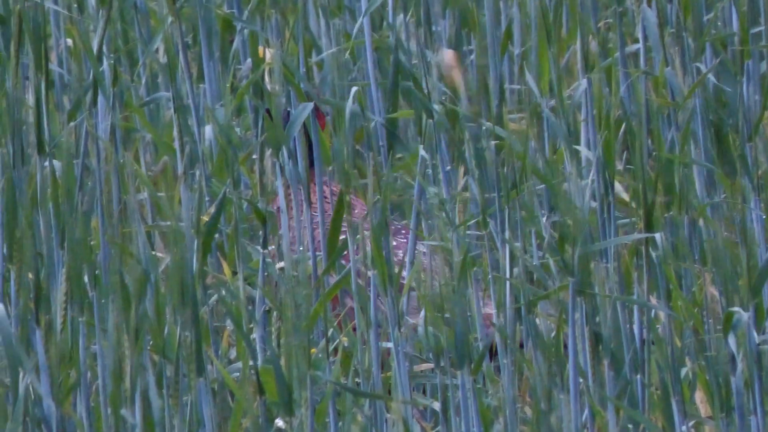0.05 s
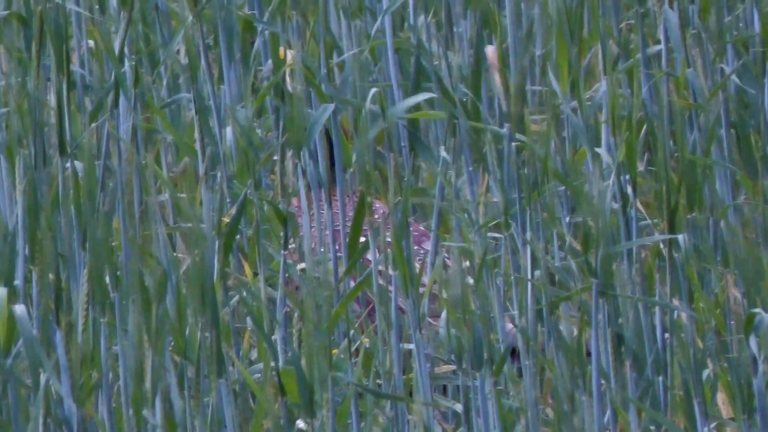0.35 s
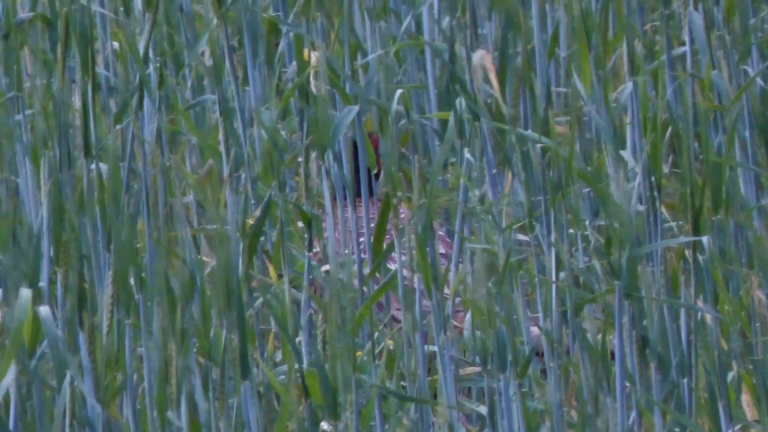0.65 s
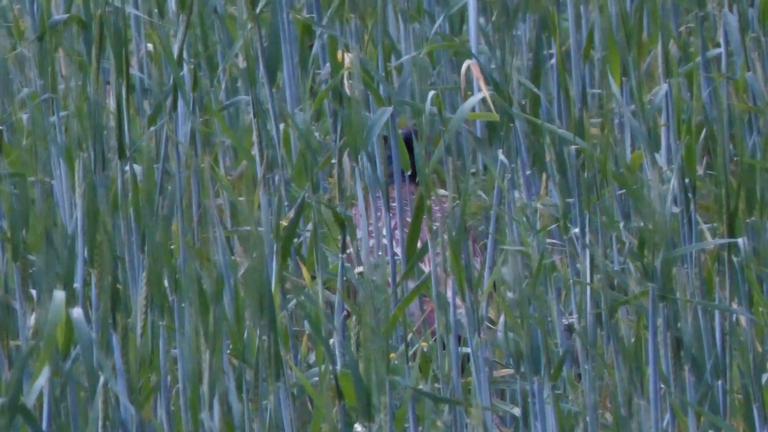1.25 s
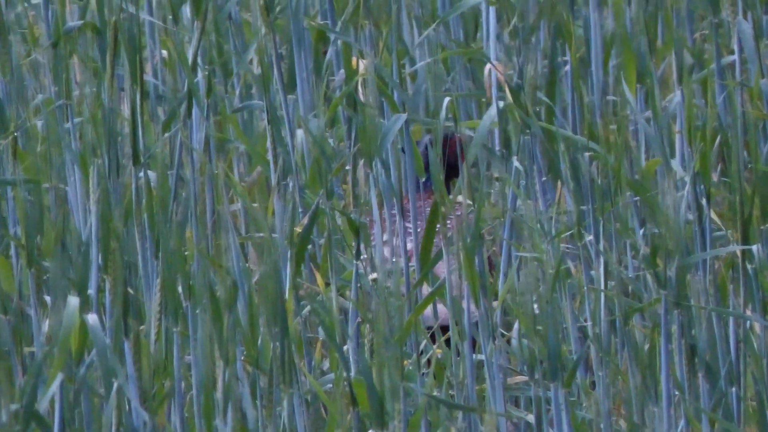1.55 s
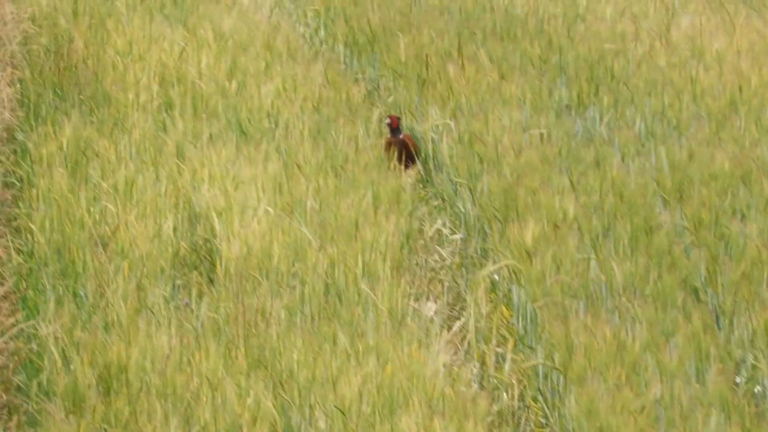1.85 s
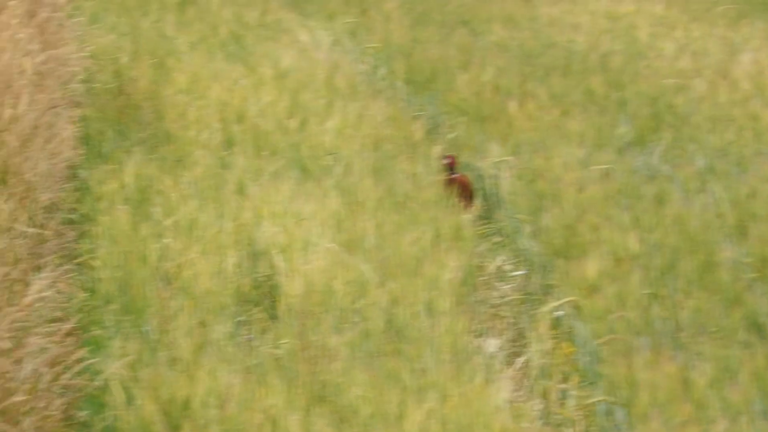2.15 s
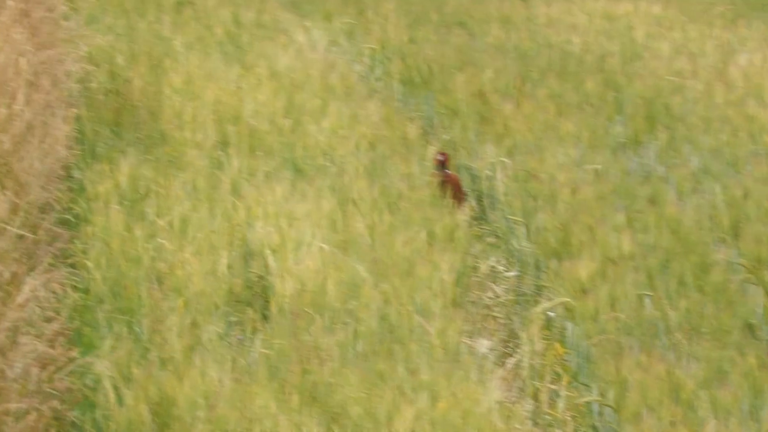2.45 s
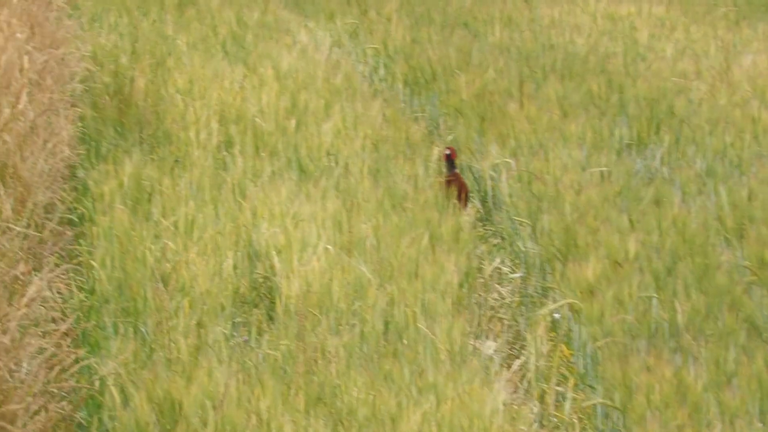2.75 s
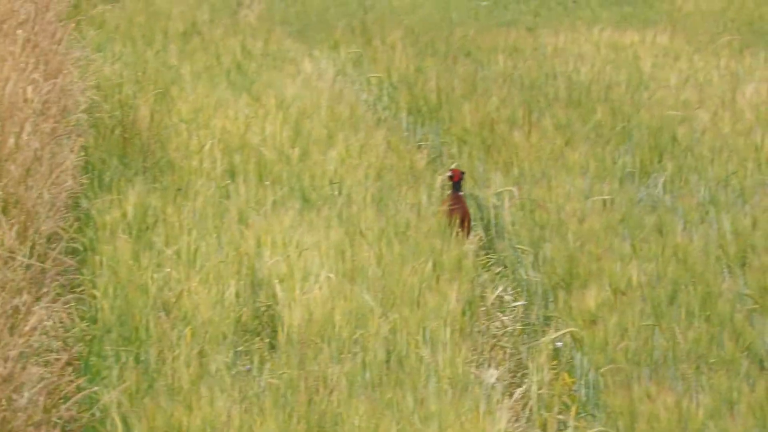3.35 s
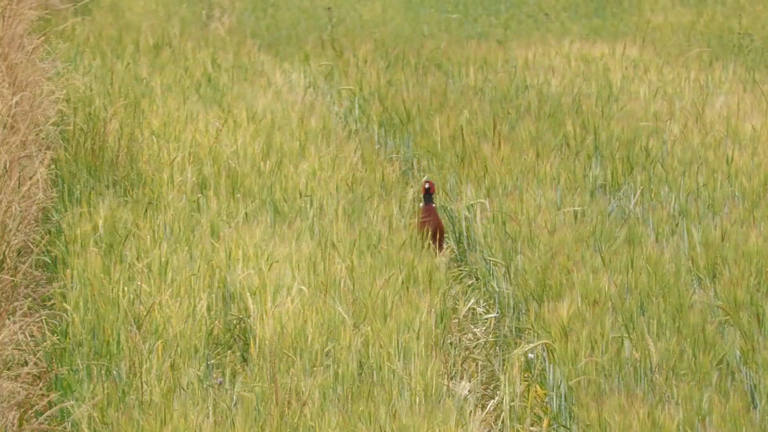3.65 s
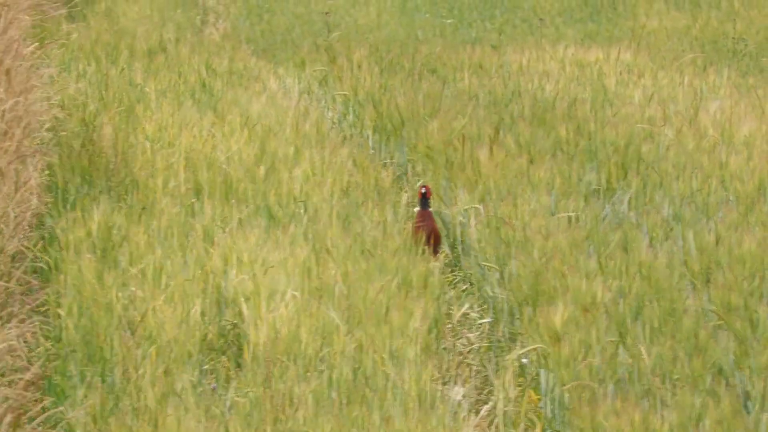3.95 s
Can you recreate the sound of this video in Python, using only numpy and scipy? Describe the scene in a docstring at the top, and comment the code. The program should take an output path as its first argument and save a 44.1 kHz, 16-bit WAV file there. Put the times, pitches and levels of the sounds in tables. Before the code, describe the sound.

A pheasant crows two short, harsh notes in a grain field while wind buffets the microphone, leaves rustle and a small bird peeps. The wind then cuts off, leaving a distant songbird whistling over soft air noise.

```python
"""Gusts of wind buffet two microphone ports in a grain field; leaves rustle and a bird peeps.
A cock pheasant crows two harsh notes: a tone near 1 kHz, modulated by an uneven flutter, shaped by
the resonances of throat and beak, and scattered back by stalks and far trees.
The scene then changes to a calm field, where a distant songbird whistles over soft air noise,
a faint hum and far twittering."""
import sys
import numpy as np
from scipy import signal
from scipy.fft import rfft, irfft
from scipy.io import wavfile
from scipy.ndimage import uniform_filter1d, minimum_filter1d

SR = 44100
rng = np.random.default_rng(int(sys.argv[2]) if len(sys.argv) > 2 else 0)


def materialize(psi):
    """Save the field psi as 16-bit PCM at rate SR to the path in sys.argv[1].

    A 1-D psi becomes a single channel; in a 2-D psi each row is a channel.
    """
    bounded = np.clip(np.atleast_2d(psi).T, -1, 1)
    quanta = np.round(bounded * 32767).astype(np.int16)
    wavfile.write(sys.argv[1], SR, quanta)


N = 176400
T = np.arange(N) / SR
CHANGE_S = 1.455  # the windy field gives way to the calm one


def amp(db):
    """Amplitude ratio of a level: a factor of ten per 20 dB."""
    return 10 ** (np.asarray(db) / 20)


def unit(x):
    """Normalisation to an rms of 1."""
    return x / np.sqrt(np.mean(x ** 2) + 1e-20)


def curve(rows, t, column=1):
    """Linear interpolation of a table column over time."""
    rows = np.array(rows)
    return np.interp(t, rows[:, 0], rows[:, column])


def spectrum(rows, hz, column=1):
    """Interpolation of a table column over log frequency."""
    rows = np.array(rows)
    return np.interp(np.log(hz + 1), np.log(rows[:, 0] + 1), rows[:, column])


def add(mix, start_s, sound):
    """Superposition: a sound adds to the mix from its start time."""
    part = mix[max(round(start_s * SR), 0):][:len(sound)]
    part += sound[:len(part)]


def wander(n, hz):
    """Random modulation: n samples of low-pass Gaussian noise with an rms near 1."""
    f = np.fft.rfftfreq(N, 1 / SR)
    return unit(irfft(rfft(rng.standard_normal(N)) * np.exp(-(f / hz) ** 2), N))[:n]


def colour(x, rows, column=1, size=2048):
    """Minimum-phase filtering: the phase follows from the log gain by the Hilbert transform."""
    hz = abs(np.fft.fftfreq(size, 1 / SR))
    log_gain = np.log(amp(spectrum(rows, hz, column)))
    taps = np.fft.ifft(np.exp(np.conj(signal.hilbert(log_gain)))).real
    return signal.oaconvolve(x, taps)[:len(x)]


def correlate(a, b, correlation):
    """Partial coherence: two independent noises mix into a correlated left-right pair."""
    c = np.clip(correlation, -1, 1)
    return np.array([a, c * a + np.sqrt(1 - c ** 2) * b])


# Likeness of ambient noise at the two ports: f/Hz, correlation
AMBIENT_CORRELATION = [(30, 0.93), (200, 1), (1000, 0.66), (2500, 0.015), (5000, -0.041), (8000, -0.35),
                       (15000, -0.27)]
def noise(rows, correlation=None):
    """Spectral shaping: white noise takes a table's colour, partly coherent at the two ports."""
    hz = np.fft.rfftfreq(N, 1 / SR)
    if correlation is None:
        correlation = spectrum(AMBIENT_CORRELATION, hz)
    white = correlate(*rfft(rng.standard_normal((2, N))), correlation)
    return unit(irfft(white * amp(spectrum(rows, hz)), N))


# Likeness of reflected sound at the two ports: f/Hz, correlation
ECHO_CORRELATION = [(1000, 0.99), (2600, 0.25), (4200, 0.7), (5500, -0.21), (7200, -0.29), (12000, -0.26)]
def echo(x, rows, build_s, size=256):
    """Reverberation: dense reflections build up, then each band falls 60 dB in its time T60."""
    hz, t, (a, b) = signal.stft(rng.standard_normal((2, SR)), SR, nperseg=size)
    reflections = correlate(a, b, spectrum(ECHO_CORRELATION, hz)[:, None])
    t60 = spectrum(rows, hz, column=2)[:, None]
    envelope = amp(-60 * t / t60) * (1 - np.exp(-(t / build_s) ** 2))
    energy = (envelope ** 2).mean(1, keepdims=True) * SR
    envelope = envelope / np.sqrt(energy) * amp(spectrum(rows, hz))[:, None]
    response = signal.istft(reflections * envelope, SR, nperseg=size)[1]
    return signal.fftconvolve(x[None], response, axes=1)[:, :N]


# Air over the calm field: f/Hz, relative spectral density/dB
CALM_AIR_SPECTRUM = [(12, -13), (27, 0), (65, 1), (120, -4), (190, -3), (330, -6.5), (600, -6.5),
                     (1080, -6), (1580, -12.5), (3000, -13.5), (4400, -15.5), (5500, -18.5), (7000, -21),
                     (10000, -24.5), (15500, -27)]
def calm_air(db=-41):
    """Broadband noise under slight amplitude modulation: soft, nearly steady air."""
    return amp(db + 0.14 * wander(N, hz=14)) * noise(CALM_AIR_SPECTRUM)


# Partials of a faint far hum: f/Hz, level/dB
HUM_PARTIALS = [(86, -55.5), (527.6, -57), (1055, -56.5)]
def hum(waver_hz=4):
    """Random frequency modulation makes each pure tone waver."""
    tones = np.zeros(N)
    for hz, db in HUM_PARTIALS:
        phase = 2 * np.pi * np.cumsum(hz + waver_hz * wander(N, hz=11.4)) / SR
        tones += amp(db) * np.sqrt(2) * np.sin(phase)
    return tones


# Air over the windy field: f/Hz, relative spectral density/dB
WINDY_AIR_SPECTRUM = [(200, -6), (600, 3.5), (1100, -2), (1600, -6.5), (2100, -5.5), (3000, -10),
                      (4500, -12.5), (7000, -24), (12000, -27)]
def windy_air(db=-36.5):
    """Stationary broadband noise: a steady rush beneath the gusts."""
    return amp(db) * noise(WINDY_AIR_SPECTRUM)


# Strength of the rustle: t/s, level/dB
RUSTLE_LEVELS = [(0, -43.5), (.2, -50), (.4, -54), (.55, -51), (1, -43), (1.28, -52), (1.44, -55)]
# Colour of the rustle: f/Hz, relative spectral density/dB
LEAF_SPECTRUM = [(1000, -36), (3000, -1), (7000, 3.5), (11000, -2.5), (16000, -8.5)]
def leaves(flicker_db=1.4):
    """Amplitude-modulated noise: leaves stirred by the gusts give a flickering hiss."""
    rustle = noise(LEAF_SPECTRUM) * amp(flicker_db * wander(N, hz=150))
    return amp(curve(RUSTLE_LEVELS, T)) * unit(rustle)


# Gusts on the ports: t/s, rumble level/dB, relative buffet level/dB, buffet left minus right/dB
PORT_GUSTS = [(0.0, -16.5, -20.5, 1), (0.096, -21, -43, -10), (0.144, -9, -19, -10.5),
              (0.256, -19, -30, -5.5), (0.332, -14, -40.5, -13.5), (0.468, -26.5, -44.5, -3),
              (0.52, -22, -43.5, 1), (0.62, -11.5, -25.5, -12), (0.676, -26, -70, -6),
              (0.7, -15.5, -28, -7), (0.794, -19.5, -42.5, -3), (0.874, -17, -28.5, -7.5),
              (1.126, -16, -34, -10), (1.174, -18.5, -30, -5.5), (1.246, -15, -29, -7.5),
              (1.338, -24, -40, -9), (1.398, -20, -35, -6), (1.44, -23, -42, -9)]
# Deep rumble and the buffeting above it: f/Hz, relative spectral density/dB
RUMBLE_SPECTRUM = [(10, -8), (35, -0.5), (70, -2.5), (130, -6.5), (200, -18), (320, -32), (700, -74),
                   (2000, -99)]
BUFFET_SPECTRUM = [(80, -30), (170, 4), (260, -2), (400, -10), (600, -20.5), (1200, -69), (3000, -59),
                   (9000, -93)]
def wind(buffet_db=4, lump_db=1.5, lump_hz=23.3):
    """Turbulent pressure fluctuations: gusts strike the two ports in weakly correlated lumps."""
    lumps = amp(lump_db * np.array([wander(N, lump_hz), wander(N, lump_hz)]))
    sides = amp(np.array([[.5], [-.5]]) * curve(PORT_GUSTS, T, column=3))
    rumble = unit(lumps * noise(RUMBLE_SPECTRUM, correlation=-0.042))
    rumble *= amp(curve(PORT_GUSTS, T))
    buffet = unit(lumps * noise(BUFFET_SPECTRUM, correlation=0.25))
    buffet *= amp(buffet_db + curve(PORT_GUSTS, T, column=2))
    return sides ** 0.62 * rumble + sides * buffet  # the rumble leans less to one side


# Scatter from the grain stalks: f/Hz, gain/dB, T60/s
STALK_SCATTER = [(300, -6, 0.14), (1020, -14, 0.29), (2010, -1, 0.18), (3770, -6, 0.25), (4640, 2.5, 0.63),
                 (8000, -1, 0.57), (15000, -21, .25)]
def stalks(sound, build_s):
    """Scattering: many stalks return a sound as a short, bright reverberation."""
    return echo(sound, STALK_SCATTER, build_s)


def twitter(count=22, centre_hz=5190, spread=0.082, glide=0.115, length_s=0.0295, db=-51.5):
    """Linear frequency sweeps: small far birds chirp at random, heard only as scattered sound."""
    chirps, t = np.zeros(N), np.arange(0, length_s, 1 / SR)
    for when, pitch, slope in rng.uniform(-1, 1, (count, 3)):
        start = CHANGE_S + (when + 1) / 2 * (T[-1] - CHANGE_S)
        hz = centre_hz * (1 + spread * pitch + glide * np.sign(slope) * t / length_s)
        add(chirps, start, np.hanning(len(t)) * np.sin(2 * np.pi * np.cumsum(hz) / SR))
    return amp(db) * stalks(chirps, build_s=.003)


def whistles(rows, edge_s, waver=0.0071, shimmer_db=2):
    """Frequency modulation: pure tones glide along parabolas, burred more the wider they sweep."""
    song = np.zeros(N)
    for start, length, first, middle, last, db in rows:
        t = np.arange(0, length, 1 / SR)
        n = len(t)
        glide = np.polyval(np.polyfit([0, .5, 1], [first, middle, last], 2), t / length)
        burr = 0.09 * abs(last - first) / middle
        hz = glide * (1 + waver * wander(n, hz=120) + burr * wander(n, hz=265))
        edge = np.clip(np.minimum(t, length - t) / edge_s, 0, 1)
        level = edge * amp(db + shimmer_db * wander(n, hz=131))
        add(song, start, level * np.sqrt(2) * np.sin(2 * np.pi * np.cumsum(hz) / SR))
    return song


# Notes of the song: start t/s, duration/s, first f/Hz, middle f/Hz, last f/Hz, relative level/dB
SONG_NOTES = [(1.59, 0.042, 3140, 2650, 2360, -42), (1.622, 0.035, 2420, 2345, 2330, -39.5),
              (1.693, 0.05, 1974, 2085, 2200, -38), (1.745, 0.06, 2774, 2744, 2690, -37),
              (1.8, 0.1, 2980, 3030, 2940, -43), (1.814, 0.053, 2700, 2701, 2684, -33),
              (1.82, 0.037, 2630, 2430, 2360, -44), (1.855, .045, 2363, 2650, 2730, -37),
              (1.9, 0.049, 2800, 3230, 3800, -38), (1.91, 0.071, 2720, 2680, 2660, -36.5),
              (1.94, 0.06, 3846, 3928, 3970, -40.5), (1.985, 0.051, 3773, 2755, 1906, -36.5),
              (2.012, .035, 2405, 2370, 2400, -39), (2.28, 0.16, 3100, 3160, 3210, -50.5),
              (2.286, 0.049, 2823, 2450, 1740, -38.5), (2.398, 0.076, 2002, 2175, 2320, -38),
              (2.45, 0.12, 2870, 2730, 2696, -35.5), (2.56, 0.096, 2627, 2632, 2670, -33.5),
              (2.601, 0.033, 2800, 3115, 3220, -34), (2.64, 0.055, 3884, 3984, 3980, -43),
              (2.675, 0.033, 2720, 2690, 2660, -39), (2.696, 0.043, 3560, 2940, 1715, -33),
              (2.775, 0.059, 3150, 2625, 2430, -39), (2.883, 0.038, 1970, 1900, 1870, -45),
              (2.933, 0.092, 1720, 1727, 1700, -46), (2.953, 0.051, 2780, 2615, 2110, -43),
              (3.345, 0.06, 2910, 2674, 2200, -41.5), (3.532, 0.03, 2930, 2580, 2390, -38),
              (3.83, 0.086, 2240, 2190, 2170, -52), (3.899, 0.092, 2210, 2765, 2900, -45.5),
              (3.92, 0.077, 1860, 1960, 1990, -48)]
# Outdoor echo of birdsong: f/Hz, gain/dB, T60/s
SONG_REVERB = [(1520, -5.5, 0.46), (2700, -3.5, 0.91), (4000, 2.5, 0.93)]
def songbird(direct_db=-5, lean_left_db=0.8):
    """A low direct-to-reverberant ratio places the whistling bird at a distance."""
    song = whistles(SONG_NOTES, edge_s=0.0045)
    sides = amp([[lean_left_db], [-lean_left_db]])
    return sides * (amp(direct_db) * song + echo(song, SONG_REVERB, build_s=0.0028))


# Peeps in the windy field: start t/s, duration/s, first f/Hz, middle f/Hz, last f/Hz, level/dB
PEEP_NOTES = [(.1, 0.054, 2240, 1920, 1960, -39.5), (1.008, 0.077, 2025, 2000, 1915, -31.5),
              (1.314, 0.068, 2000, 2000, 1995, -34), (1.372, 0.049, 2060, 2020, 1980, -41)]
def peeps(echo_db=-8):
    """Direct sound dominates at short range: a nearer bird's soft peeps swell and fade."""
    song = whistles(PEEP_NOTES, edge_s=.028)
    return song + amp(echo_db) * echo(song, SONG_REVERB, build_s=0.012)


def crow(contour, start, length, db, swell_s, release_s, open_s, bright_db):
    """Amplitude and frequency modulation by an uneven flutter add the sidebands heard as rasp."""
    flutter_hz, flutter_jitter, pitch_jitter = 183.1, 0.28, 0.024
    nick_depth, bend_depth, shimmer_db = .7, 0.099, 1.3
    overtone_db, hiss_db, burst_db, top_harmonic = -8.5, -11, 4.5, 13
    t = np.arange(0, length, 1 / SR)
    n = len(t)
    pitch = curve(contour, start + t)
    rate = flutter_hz * (1 + flutter_jitter * wander(n, hz=183))
    flutter = -np.cos(2 * np.pi * np.cumsum(rate) / SR)
    # each beat nicks the fundamental and bends its pitch
    nicks = 1 - nick_depth * ((1 - flutter) / 2) ** 2
    shimmer = amp(shimmer_db * wander(n, hz=260))
    phase = 2 * np.pi * np.cumsum(pitch * (1 + pitch_jitter * wander(n, hz=330))) / SR
    bend = bend_depth * 2 * np.pi * np.cumsum(-flutter * pitch) / SR
    bend = signal.lfilter(*signal.butter(1, 40, "high", fs=SR), bend)  # no slow phase drift
    tone = unit(nicks * shimmer * np.cos(phase + bend))
    # overtones and hiss burst on each beat and open as the note grows
    overtones = sum(np.cos(k * (phase + 0.63 * bend) + 2 * np.pi * rng.random())
                    for k in range(2, top_harmonic + 1))
    hiss = rng.standard_normal(n) * np.sqrt(top_harmonic + 1)
    bursts = unit(amp(burst_db * flutter))
    opening = amp(bright_db - 3 * np.exp(-t / open_s))
    rasp = opening * bursts * (amp(overtone_db) * overtones + amp(hiss_db) * hiss)
    attack = np.minimum(t / .0025, 1)
    release = np.minimum((length - t) / release_s, 1)
    swell = amp(db - 6 * np.exp(-t / swell_s))
    return attack * release * swell * (tone + rasp)


# Pitch contours, one list for each crow note: t/s, f/Hz
CROW_CONTOURS = [
    [(.547, 849), (.56, 858), (.575, 965), (.61, 1004), (.64, 999), (.651, 969), (.658, 1085), (.675, 1120)],
    [(.8, 938.5), (.812, 984), (.83, 1005), (.845, 922), (.87, 965)],
]
# Crow notes: start t/s, duration/s, source level/dB, swell/s, release/s, opening/s, brightness/dB
CROW_NOTES = [(.547, 0.13, -12.8, 0.013, 0.027, .035, 2), (.8, 0.07, -13, 0.0023, 0.024, .005, 2)]
# Resonances of throat and beak: f/Hz, gain/dB
VOCAL_TRACT = [(300, -32), (520, -4), (660, 1), (880, 1.5), (1000, 1), (1160, 1), (1350, -0.5), (1600, -10),
               (1850, -8), (2100, -18.5), (2900, -15.5), (3250, -4.5), (3450, -1), (3880, 3.5), (4050, -2),
               (4280, -10), (4540, -1), (4750, -9), (6300, -15), (7200, -16), (9500, -21.5), (15000, -49)]
# Straight path to the ports: f/Hz, left gain/dB, right gain/dB
DIRECT_PATH = [(300, -2, -0.5), (1030, -6, -1), (2200, -11.5, -6), (3900, -11, -0.5), (7900, -41.5, -20.5)]
# Echo from the far trees: f/Hz, relative gain/dB, T60/s
TREE_REVERB = [(300, 2, 0.94), (1050, -16, 0.95), (2010, 2.5, 0.9), (3960, -5, 0.87), (8000, -18, 0.28),
               (15000, -18, .5)]
def pheasant(echo_left_db=-5.5, echo_right_db=0.5):
    """Source-filter principle: throat and beak shape the notes, heard direct and scattered."""
    source = np.zeros(N)
    for contour, note in zip(CROW_CONTOURS, CROW_NOTES):
        add(source, note[0], crow(contour, *note))
    voice = colour(source, VOCAL_TRACT)
    direct = np.array([colour(voice, DIRECT_PATH, column=side) for side in (1, 2)])
    scattered = stalks(voice, build_s=0.0084) + echo(voice, TREE_REVERB, build_s=0.027)
    return direct + amp([[echo_left_db], [echo_right_db]]) * scattered


def scene(fade_s=.035):
    """Superposition of the sources, with a quick crossfade from the windy field to the calm one."""
    windy = pheasant() + peeps() + wind() + leaves() + windy_air()
    calm = hum() + calm_air() + twitter()
    fade = np.clip((T - CHANGE_S) / fade_s + .5, 0, 1)
    return (1 - fade) * windy + np.sqrt(fade) * calm + songbird()


def record(dry, offset=0.14, window_samples=89, cutoff_hz=15850):
    """Peak limiting and band limiting: with a constant offset, the sound is held near full scale."""
    needed_gain = 1 / np.maximum(abs(dry + offset), 1)
    held_gain = minimum_filter1d(needed_gain, window_samples, axis=1)
    gain = uniform_filter1d(held_gain, window_samples, axis=1)
    limited = (dry + offset) * gain
    lowpass = signal.firwin(511, cutoff_hz, window=("kaiser", 9), fs=SR)
    return signal.oaconvolve(limited - offset, lowpass[None], "same") + offset


dry = scene()
out = record(dry)
materialize(out)
```